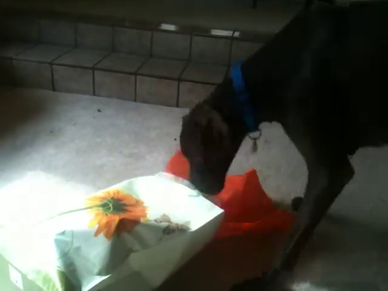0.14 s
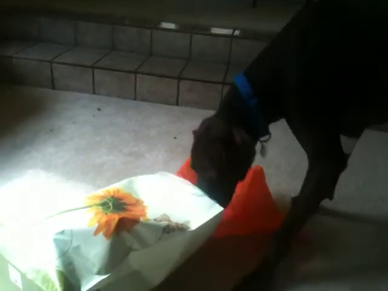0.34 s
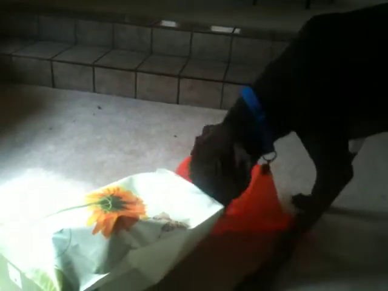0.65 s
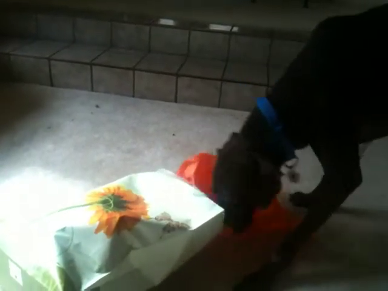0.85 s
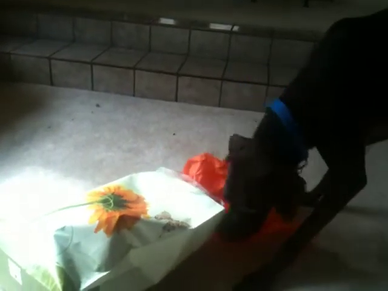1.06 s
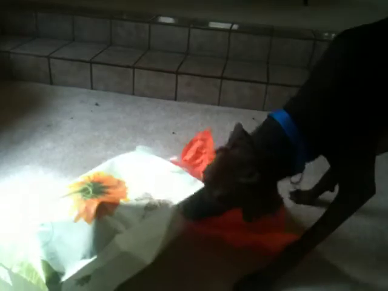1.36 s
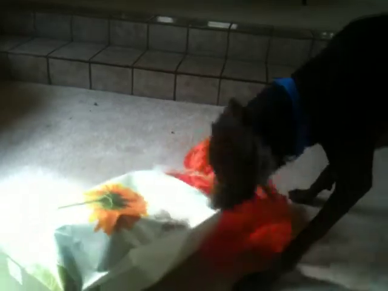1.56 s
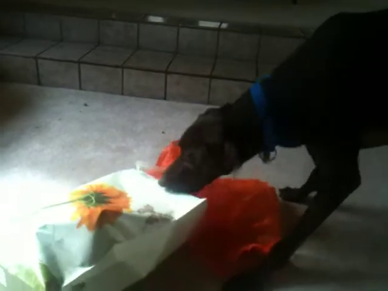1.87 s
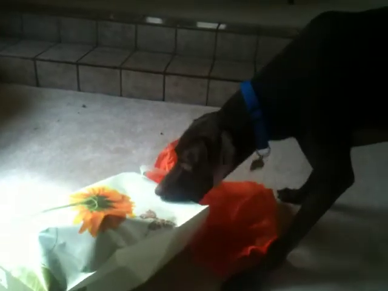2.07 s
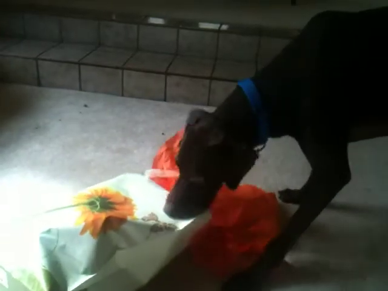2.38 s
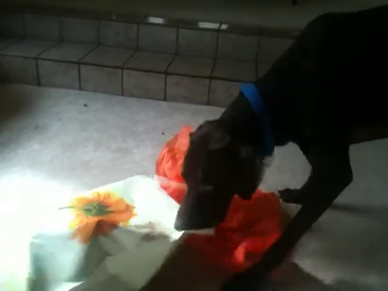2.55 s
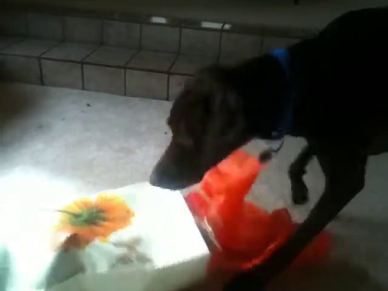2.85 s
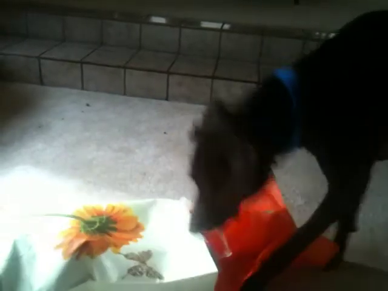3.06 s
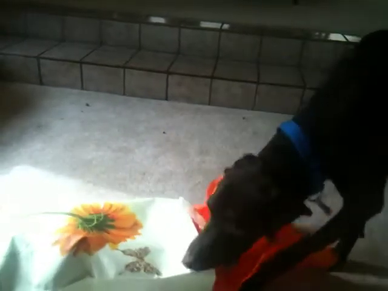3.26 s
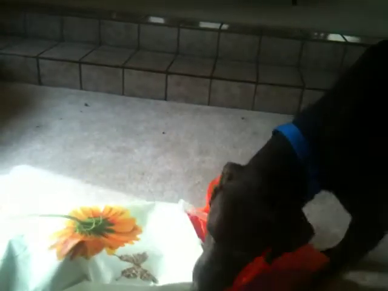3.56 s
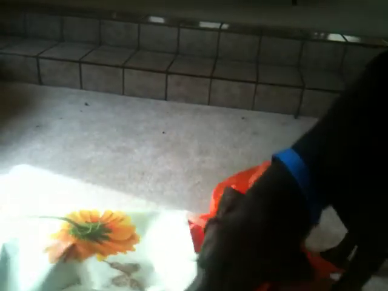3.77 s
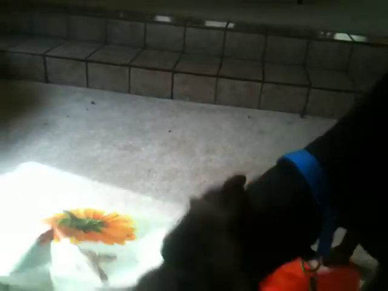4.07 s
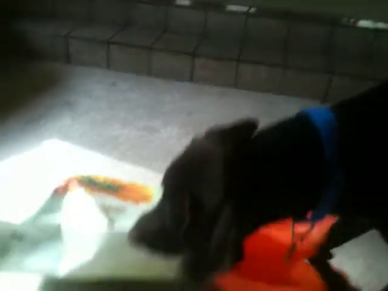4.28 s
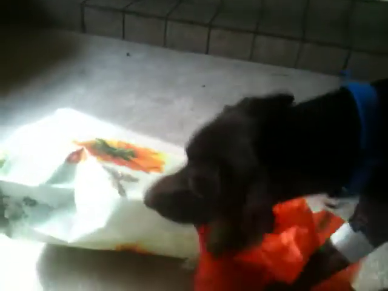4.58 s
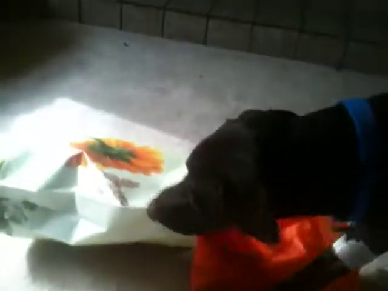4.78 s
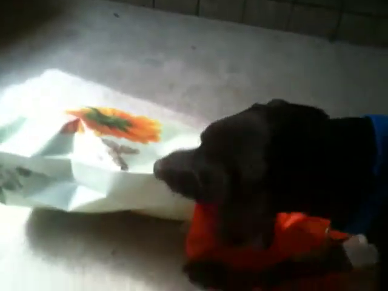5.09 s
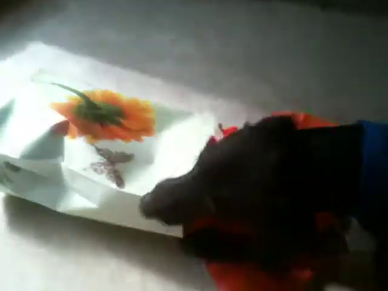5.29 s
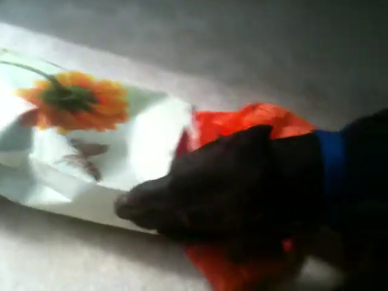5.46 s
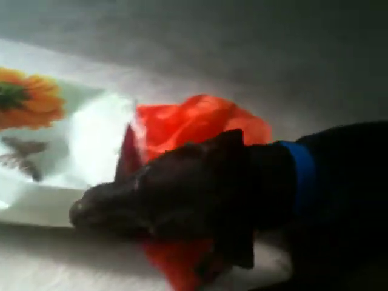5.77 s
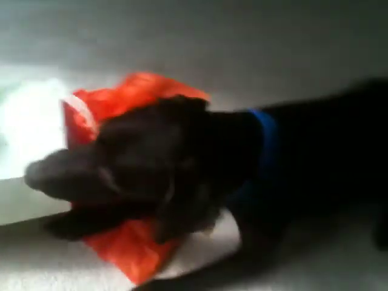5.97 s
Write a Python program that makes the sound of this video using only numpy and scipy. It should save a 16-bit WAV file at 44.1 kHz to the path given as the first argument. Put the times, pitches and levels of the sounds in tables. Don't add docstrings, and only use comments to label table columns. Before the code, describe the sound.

Close, dry rustling of thin tissue and a stiff paper bag as a dog noses in. Small crackles thicken, pause around two seconds with tiny metallic collar clinks, then a very loud bag snap bursts out. More scrunching builds to another busy run of sharp cracks, then settles into lighter crinkling. Small indoor room, brief reverberation, thin microphone with little bass and faint hiss.

```python
import sys
import numpy as np
from scipy import signal
from scipy.fft import rfft, irfft, next_fast_len
from scipy.io import wavfile
from scipy.ndimage import uniform_filter1d, map_coordinates

SR = 44100
rng = np.random.default_rng(int(sys.argv[2]) if len(sys.argv) > 2 else 0)


def waveform_to_disk(signal):
    frames = np.transpose(np.atleast_2d(signal))
    scaled = np.clip(frames, -1, 1) * 32767
    samples = np.round(scaled).astype(np.int16)
    wavfile.write(sys.argv[1], SR, samples)


def rack_gain(trim_db):
    fader = np.asarray(trim_db, float)
    return 10 ** (fader / 20)


N = 270333

# start in seconds, hold in seconds, wall scrape level in dB,
# stirred air in dB re the scrape.
SHOVES = [(0.007, 0.3, -57, -11.5), (0.437, 0.39, -60.5, -7.5), (0.934, 0.089, -56, -7.5),
          (1.215, 0.12, -55.5, -4.5), (1.303, 0.11, -57.5, 1), (1.48, 0.13, -56.5, -1.5),
          (1.846, 0.033, -63.5, 2), (1.984, 0.025, -63, -19), (2.377, 0.041, -61.5, -5),
          (2.546, 0.095, -51.5, -1), (2.69, 0.068, -49.5, -8), (2.834, 0.015, -40.5, -1),
          (2.992, 0.07, -55, -3), (3.203, 0.018, -60, -8), (3.514, 0.033, -59.5, -1.5),
          (3.695, 0.094, -55.5, -8.5), (3.858, 0.14, -52.5, -1.5), (4.121, 0.0104, -43.5, -1),
          (4.21, 0.23, -53, -16), (4.358, 0.074, -48, -13), (4.432, 0.046, -49.5, -2),
          (4.564, 0.083, -45.5, -13), (4.751, 0.098, -50, -9.5), (4.91, 0.4, -57, -5),
          (5.319, 0.054, -51.5, 0), (5.474, 0.017, -51.5, 0), (5.607, .15, -61, -1.5),
          (5.75, 0.082, -57, 1.5), (5.902, 0.05, -51.5, -11), (6.013, 0.022, -57.5, 5.5)]
# start in seconds, hold in seconds, fizz level in dB,
# time to sink 10 dB in seconds (its size counts).
DRAGS = [(0, 0.13, -59, 0.14), (.165, .06, -56.5, .06), (0.297, .05, -58.5, .25), (.55, 0.089, -62.5, 0.2),
         (.745, .02, -57.5, 0.15), (0.868, .16, -56, 0.07), (1.138, 0.17, -54.5, .13),
         (1.45, .17, -59, 0.06), (1.81, 0.14, -67, .15), (1.947, .01, -61.5, .012),
         (2.1, 0.037, -66.5, -0.1), (2.239, .02, -63.5, -0.06), (2.36, 0.18, -64.5, 0.3),
         (2.57, .12, -52.5, .1), (2.7, 0.1, -50.5, .05), (2.84, .02, -45.5, 0.0842),
         (2.935, 0.093, -55.5, .1), (3.118, 0.13, -64, 0.3), (3.503, 0.028, -56.5, .11),
         (3.722, 0.064, -56.5, 0.3), (3.895, 0.11, -54, 0.13), (4.108, .02, -49, 0.1), (4.2, .12, -55, 0.2),
         (4.338, 0.15, -46, .08), (4.562, 0.096, -43, 0.02), (4.69, .05, -53, 0.1),
         (4.898, 0.037, -55.5, 0.13), (4.77, 0.094, -48, .06), (4.98, 0.24, -59.5, 0.24),
         (5.306, 0.082, -55, .08), (5.477, 0.17, -62, .1), (5.723, 0.13, -58.5, .03),
         (5.887, .1, -52.5, .08), (6.08, .06, -64, .1)]
# time in seconds, treble lift in dB.
TISSUE_SHEEN = [(0, 7.5), (.4, 2.5), (.8, 7.5), (1.3, 3), (1.7, 3), (1.95, 14.5), (2.3, 12), (2.5, 7),
                (2.9, -5), (3.15, 7), (3.7, 1.5), (4.25, -5.5), (4.45, 2.5), (4.62, 5.5), (4.75, 0.5),
                (5.5, 4.5), (5.9, -1), (6.13, 2)]
# frequency in Hz, level in dB per Hz.
WALL_SPECTRUM = [(350, -32), (600, -20.5), (743, -4.5), (920, -6.5), (1170, 0.5), (1650, 0.5), (2230, 3),
                 (3500, -4.5), (4550, -26), (7700, -120)]
# frequency in Hz, level in dB per Hz.
TISSUE_SPECTRUM = [(1880, -53.5), (3200, 0.5), (3510, -4), (6370, -1.5), (8320, -5), (9960, -13.5),
                   (12800, -15.5), (14200, -22), (15400, -20), (15800, -12.5)]
# frequency in Hz, level in dB per Hz.
AIR_SPECTRUM = [(18, -44), (30, -6), (75, -12), (183, -2.5), (271, -2), (382, 0), (598, -8), (700, -9),
                (910, -18.5), (1540, -120)]


def rustle():
    shove_rise_s, shove_fall_s, drag_rise_s = 0.05, 0.083, 0.036
    start, hold, db, air_db = np.transpose(SHOVES)[:, :, None]
    scrape_gain = strokes(start, hold, db, shove_rise_s, shove_fall_s, rest_db=-99)
    stir_gain = strokes(start, hold, db + air_db, shove_rise_s, shove_fall_s, rest_db=-70)
    start, hold, db, fall = np.transpose(DRAGS)[:, :, None]
    drag_gain = strokes(start, hold, db, drag_rise_s, fall, rest_db=-74)
    shared_db = 1.2 * wobble(40) - 2.5

    wall = creases(rate=1300, low_hz=600, high_hz=4000, cycles=9, spread_db=3, clump_db=2.8, smooth=.68)
    wall = unit(coloured(wall, WALL_SPECTRUM))
    fizz = creases(rate=2500, low_hz=3200, high_hz=15000, cycles=8, spread_db=3.1, clump_db=2.5, smooth=.56)
    fizz = unit(coloured(fizz, TISSUE_SPECTRUM))
    sheen_s, sheen_db = np.transpose(TISSUE_SHEEN)
    sheen_db = np.interp(np.arange(N) / SR, sheen_s, sheen_db)
    dull = signal.filtfilt(*signal.butter(1, 6500, fs=SR), fizz)
    fizz = dull * rack_gain(-.4 * sheen_db) + (fizz - dull) * rack_gain(sheen_db)
    air = unit(coloured(rack_gain(2.6 * wobble(31)) * rng.standard_normal(N), AIR_SPECTRUM))
    return rack_gain(shared_db) * (scrape_gain * wall + drag_gain * fizz + stir_gain * air)


def strokes(start, hold, db, rise, fall, rest_db):
    t = np.arange(0, N + 64, 64) / SR
    early = np.maximum(start - t, 0) / rise
    late = np.maximum(t - start - np.abs(hold), 0) / np.abs(fall)
    power = np.sum(rack_gain(db - 10 * (early + late)) ** 2, axis=0) + rack_gain(rest_db) ** 2
    return np.interp(np.arange(N) / SR, t, np.sqrt(power))


def creases(rate, low_hz, high_hz, cycles, spread_db, clump_db, smooth):
    chance = rate / SR * rack_gain(clump_db * wobble(70))
    s = np.flatnonzero(rng.random(N) < chance) / SR
    draw = rng.random((N // 8, 3, 1))[:len(s)]
    hz = low_hz * (high_hz / low_hz) ** draw[:, 0]
    size_db = spread_db * np.minimum(-np.log(1 - draw[:, 1]), 4)
    size = rack_gain(size_db) * np.sqrt(hz) * np.sign(draw[:, 2] - .5)
    t = np.arange(160) / SR
    clicks = place(s[:len(draw)], size * rack_gain(-60 * t * hz / cycles) * np.sin(2 * np.pi * hz * t))
    slide = patchy(rng.standard_normal(N), depth_db=1.5)
    return np.sqrt(1 - smooth) * unit(clicks) + np.sqrt(smooth) * unit(slide)


def patchy(x, depth_db):
    z = signal.stft(x, nperseg=256)[2]
    field = uniform_filter1d(rng.standard_normal(z.shape), size=5, axis=0)
    field = uniform_filter1d(field, size=6, axis=1)
    return signal.istft(z * rack_gain(depth_db * unit(field)), nperseg=256)[1][:N]


# time in seconds, wall ring in dB, crack in dB re the ring, wall pitch in Hz.
BUCKLES = [(1.3, -28, -23, 1350), (1.369, -42.5, -13, 1500), (1.438, -44, -5, 2350),
           (1.511, -38, -17, 1230), (1.581, -41.5, -19, 1400), (1.631, -45.5, -1, 2190),
           (2.359, -48.5, -3, 1210), (2.545, -45, -20, 1480), (2.752, -41.5, 5, 1540),
           (2.832, -21.5, -6.5, 2230), (2.924, -39, -26, 1320), (3.434, -45.5, -32, 1130),
           (3.501, -46.5, -5, 2280), (3.65, -35, -12, 1610), (3.682, -42, -6, 2520), (3.856, -47, -3, 1410),
           (3.873, -35, -13, 1410), (3.896, -33.5, -14, 1740), (3.976, -40.5, -21, 1740),
           (4.033, -40.5, 2.5, 1420), (4.105, -29.5, -6.5, 2260), (4.272, -45, -18, 1130),
           (4.33, -41.5, -10, 2200), (4.366, -40, -13, 2360), (4.4149, -22.5, -9, 1710),
           (4.488, -23.5, -15, 2270), (5.483, -32, -7.5, 2420), (5.794, -38, -13, 1350),
           (5.849, -28, -4.5, 1820), (6.031, -46, -23, 1210), (1.72, -59, -2, 3020),
           (2.017, -57.5, 7.5, 2800), (2.084, -61, 7, 1000), (2.188, -65, 4, 2300), (5.715, -60, -1, 2300)]
# time in seconds, wall ring in dB, wall pitch in Hz.
FOLDS = [(.747, -49.5, 2270), (1.307, -48, 1130), (1.49, -48, 1280), (1.72, -60, 2820), (1.805, -58.5, 830),
         (2.08, -50.5, 2310), (2.46, -57, 942), (2.564, -40.5, 1170), (2.603, -47, 1440),
         (2.733, -43, 1720), (2.8, -46, 1150), (2.847, -26, 2160), (2.86, -39, 1160), (2.843, -36, 1100),
         (2.838, -39, 810), (.017, -49, 2250), (2.994, -52, 2230), (3.195, -52, 790), (3.327, -56, 1550),
         (3.596, -50.5, 1500), (4.12, -30, 1640), (4.126, -30.5, 1840), (4.49, -27, 2140),
         (5.116, -50.5, 1430), (5.182, -44.5, 1280), (5.233, -50, 1540), (5.311, -42.5, 1460),
         (5.324, -38.5, 1490), (5.347, -42, 1360), (5.412, -41.5, 1240), (5.511, -44, 1290),
         (5.632, -47.5, 1980), (5.862, -44, 1740)]
# time in seconds, wall ring in dB, wall pitch in Hz.
PANELS = [(1.301, -33, 2620), (1.357, -46, 2340), (1.423, -54, 1210), (1.438, -49, 1470),
          (1.511, -42, 1880), (1.579, -55, 2230), (1.581, -51, 950), (2.832, -25, 1480), (3.434, -54, 730),
          (3.637, -52, 1120), (3.65, -35, 2500), (3.65, -43.5, 1200), (3.683, -51, 1800),
          (3.974, -51.5, 1200), (4.032, -46, 2300), (4.104, -33.5, 1500), (4.106, -34, 3000),
          (4.122, -37, 950), (1.583, -47, 1700), (5.2, -51, 620), (5.33, -48, 650), (2.7, -54, 700),
          (2.58, -49.5, 750), (4.4142, -25, 2440), (4.415, -30.5, 1210), (4.486, -31, 1300),
          (4.494, -31.5, 1530), (4.5, -35.5, 876), (4.502, -51, 1690), (4.76, -49, 1250),
          (5.483, -44, 1520), (5.652, -49.5, 1160), (5.78, -54, 1500), (5.828, -56, 1260),
          (5.849, -28, 2700), (5.849, -40, 1390), (5.855, -37, 2300)]
# time in seconds, crack level in dB.
TICKS = [(0.108, -40), (0.16, -46), (0.2997, -49), (0.742, -42.5), (0.76, -37), (0.7997, -42), (0.865, -46),
         (0.878, -40.5), (0.899, -45), (0.998, -46), (1.0063, -35), (1.068, -42.5), (1.1215, -39.5),
         (1.1432, -40.5), (1.1543, -45), (1.1675, -34.5), (1.178, -43), (1.1978, -46), (1.2393, -38),
         (1.261, -39.5), (1.295, -44), (1.3094, -45), (1.4885, -43), (1.615, -49), (2.111, -48),
         (2.601, -43), (2.7092, -48), (2.8, -34), (2.848, -27), (2.9851, -50), (3.014, -41),
         (3.1815, -46.5), (3.496, -48), (3.7077, -44), (4.4677, -36), (4.568, -33), (4.577, -32),
         (4.587, -30.5), (4.6242, -31), (4.6568, -31), (4.688, -44), (4.7178, -42), (4.795, -47),
         (4.8426, -38), (4.872, -44), (4.9102, -55), (4.9294, -56), (4.9761, -63), (4.9766, -49),
         (5.043, -43.5), (5.071, -40.5), (5.117, -53), (5.2, -43), (5.234, -39), (5.303, -41),
         (5.354, -36.5), (5.3815, -41), (5.5947, -45), (5.8536, -35), (5.9583, -40)]
# frequency in Hz, level in dB per Hz.
BAG_CRACK_SPECTRUM = [(1760, 0), (2600, 5), (3400, 1.5), (4600, 7), (6360, 3.5), (8000, -2.5), (9400, -15),
                      (11300, -14.5), (15800, -38)]
# frequency in Hz, level in dB per Hz.
TISSUE_CRACK_SPECTRUM = [(1760, 0), (2600, 3.5), (3400, 7), (4600, 4.5), (6360, 5.5), (7300, -2.5),
                         (8050, 4.5), (9380, -5), (11300, -14), (15800, -34)]


def snaps():
    # (s, ring dB, crack dB re ring, wall Hz, crack t60 s)
    bag = [(*row, .0072) for row in BUCKLES]
    bag += [(s, db, -14, hz, .007) for s, db, hz in FOLDS]
    bag += [(s, db, -25, hz, .007) for s, db, hz in PANELS]
    passed_db = -6.5
    tissue = [(s, db - 8 + passed_db, -passed_db, 2270, .0052) for s, db in TICKS]
    s, db, crack_db, hz, t60 = np.transpose(bag + tissue)[:, :, None]
    t = np.arange(1400) / SR
    ring = thud(hz, hz, t, cycles=19.6, scatter=0.38, run=0.004002, side_db=-13.0, spread_db=4.5, count=8)
    decay = rack_gain(-60 * t / t60) + rack_gain(-1 - 60 * t / (3 * t60))
    burst = decay * (1 - np.exp(-t / 0.00027)) * rng.standard_normal(ring.shape)
    burst /= np.abs(burst).max(axis=1, keepdims=True)
    burst = rack_gain(db + crack_db + 8.5) * burst
    n = len(bag)
    bag_crack = coloured(place(s[:n, 0], burst[:n]), BAG_CRACK_SPECTRUM)
    tissue_crack = coloured(place(s[n:, 0], burst[n:]), TISSUE_CRACK_SPECTRUM)
    return place(s[:, 0], rack_gain(db + 4) * ring) + bag_crack + tissue_crack


def thud(hz, body_hz, t, cycles, scatter, run, side_db, spread_db, count):
    draw = rng.uniform(-1, 1, (len(hz), 3, count))
    rows = np.sin(2 * np.pi * hz * t) * rack_gain(-60 * t * hz / cycles)
    for k in range(count):
        late = np.maximum(t - run * draw[:, 0, k, None] ** 2, 0)
        side_hz = hz * (body_hz / hz) ** 0.38 * np.exp(scatter * draw[:, 1, k, None])
        mode_db = side_db + spread_db * draw[:, 2, k, None] - 60 * late * hz / cycles
        rows += rack_gain(mode_db) * np.sin(2 * np.pi * side_hz * late)
    rows *= 1 - np.exp(-t * hz / 0.85)
    return rows / np.abs(rows).max(axis=1, keepdims=True)


# time in seconds, peak level in dB.
SPIKES = [(1.3005, -36), (2.7518, -37), (2.7996, -36), (2.8325, -13.5), (2.8335, -14.5), (2.8482, -24),
          (3.6505, -45), (4.104, -33), (4.4148, -27), (4.4874, -32), (4.5867, -30), (4.7952, -40),
          (5.483, -42), (5.8497, -19.5), (1.6325, -43), (2.5273, -50), (4.3652, -40), (4.033, -42),
          (3.0142, -45), (5.311, -42), (5.856, -33)]
# frequency in Hz, level in dB per Hz.
SPIKE_SPECTRUM = [(900, -14.5), (2000, 0), (3400, -0.5), (4600, 0.5), (6200, 1.5), (8000, -8), (11000, -17),
                  (13500, -26), (15800, -44)]


def spikes():
    s, db = np.transpose(SPIKES)[:, :, None]
    t = np.arange(300) / SR
    burst = rack_gain(-60 * t / 0.0026) * rng.standard_normal((len(s), len(t)))
    burst /= np.abs(burst).max(axis=1, keepdims=True)
    return coloured(place(s[:, 0], rack_gain(db + 3) * burst), SPIKE_SPECTRUM)


# time in seconds, peak level in dB, pitch in Hz.
PUFFS = [(0.094, -51.5, 275), (0.924, -50.5, 295), (1.208, -43, 266), (1.301, -36.5, 408),
         (1.361, -45, 306), (1.654, -48, 368), (3.655, -48, 390), (3.51, -51, 144), (4.8, -60, 141),
         (4.495, -35, 500), (1.509, -41, 374), (1.581, -41, 420), (1.974, -50, 282), (2.365, -41, 362),
         (2.629, -59, 323), (2.715, -42.5, 377), (2.828, -30, 264), (3.5, -49, 387), (3.601, -49.5, 230),
         (1.37, -51, 150), (1.205, -53, 120), (4.49, -41, 179), (2.39, -52.5, 170), (1.76, -58, 300),
         (5.3, -51, 150), (3.869, -41, 362), (3.973, -41.5, 383), (4.107, -38, 323), (4.18, -48, 358),
         (4.27, -42.5, 314), (4.412, -36, 350), (4.482, -32, 385), (4.619, -48, 279), (4.757, -47, 365),
         (4.89, -49, 294), (5.181, -45, 244), (5.233, -47, 300), (5.307, -40.5, 358), (5.487, -40.5, 460),
         (5.931, -49.5, 244), (6.028, -40, 415)]


def puffs():
    s, db, hz = np.transpose(PUFFS)[:, :, None]
    t = np.arange(4000) / SR
    bounce = thud(hz, 296, t, cycles=9.2, scatter=0.643, run=0.0114, side_db=-12.5, spread_db=7.5, count=6)
    return place(s[:, 0], rack_gain(db) * bounce)


# time in seconds, peak level in dB, share of the thin tag from 0 to 1.
CLINKS = [(1.808, -61, 0), (1.826, -58, .02), (1.853, -62, .02), (1.894, -50, 0), (1.909, -53.5, 0.1),
          (1.9345, -45, 0), (1.94, -33.5, 0.3), (2.121, -45, 0), (2.129, -49, 0.9), (3.133, -49, 0.33),
          (3.229, -51, 0.8)]
# frequency in Hz, level in dB, t60 in seconds.
THICK_TAG = [(6260, 6, 0.026), (7020, 6.5, 0.018), (12400, -10, .035), (15200, -19, 0.036)]
# frequency in Hz, level in dB, t60 in seconds.
THIN_TAG = [(8650, 8, 0.045), (11670, -5, 0.062)]
# time in seconds, peak level in dB.
RING_STRIKES = [
    (0.2987, -36),
]
# frequency in Hz, level in dB, t60 in seconds.
RING_MODES = [(2733, 3, 0.055), (4684, -3, 0.05), (5650, 0.5, 0.038)]


def collar():
    s, db, thin = np.transpose(CLINKS)[:, :, None]
    tags = (1 - thin) * metal(THICK_TAG, count=len(s)) + thin * metal(THIN_TAG, count=len(s))
    t = np.arange(tags.shape[1]) / SR
    tick = np.diff(rng.standard_normal(tags.shape), 2, prepend=0, append=0) * rack_gain(-3.5 - 60 * t / 0.013)
    clinks = place(s[:, 0], rack_gain(db - 8) * (tags + tick))
    s, db = np.transpose(RING_STRIKES)[:, :, None]
    return clinks + place(s[:, 0], rack_gain(db - 10) * metal(RING_MODES, count=len(s)))


def metal(modes, count):
    t = np.arange(6000) / SR
    strikes = np.zeros((count, len(t)))
    for hz, db, t60 in modes:
        strength_db = 2 * rng.standard_normal((count, 1))
        strikes += rack_gain(db + strength_db - 60 * t / t60) * np.sin(2 * np.pi * hz * t)
    return strikes


# time in seconds, length in seconds, peak level in dB, pitch in Hz.
SQUEAKS = [
    (2.475, 0.033, -60, 1850),
    (1.8, .13, -65.5, 6200),
    (2.115, .04, -66, 2300),
    (3.44, 0.0376, -60.5, 690),
]


def squeaks():
    s, length, db, hz = np.transpose(SQUEAKS)[:, :, None]
    u = np.clip((np.arange(N) / SR - s) / length, 0, 1)
    waver = 1 + 0.0116 * wobble(150)
    phase = 2 * np.pi * np.cumsum(hz * waver, axis=1) / SR
    swell = np.sqrt(np.sin(np.pi * u).clip(0))
    return np.sum(rack_gain(db + 4.2 * wobble(90)) * swell * np.sin(phase), axis=0)


# frequency in Hz, t60 in seconds.
ROOM_DECAY = [(150, 0.34), (2000, 0.12), (6000, 0.088), (14000, 0.043)]


def room(x):
    hz, t, z = signal.stft(rng.standard_normal(SR // 2), SR, nperseg=256)
    decay = rack_gain(-60 * t / along(ROOM_DECAY, hz)[:, None])
    tail = signal.istft(z * decay, SR, nperseg=256)[1]
    tail = np.pad(tail / np.linalg.norm(tail), (200, 0))
    tail[[270, 640]] += [.5, .4]
    return signal.fftconvolve(x, tail)[:N]


def unit(x):
    return x / np.sqrt(np.mean(x ** 2) + 1e-20)


def along(points, hz):
    f, v = np.transpose(points)
    return np.interp(np.log(hz + 1), np.log(f + 1), v)


def wobble(rate):
    return map_coordinates(rng.standard_normal(int(N * rate / SR) + 4), [np.arange(N) * rate / SR])


def coloured(x, spectrum):
    gain = rack_gain(along(spectrum, np.fft.rfftfreq(2048, 1 / SR)))
    cep = irfft(np.log(np.maximum(gain, 1e-4)))
    cep[1:1024] *= 2
    cep[1025:] = 0
    h = irfft(np.exp(rfft(cep)))
    return signal.fftconvolve(x, h / np.linalg.norm(h))[:N]


def place(s, rows):
    at = np.round(s * SR).astype(int)[:, None] + np.arange(rows.shape[1])
    return np.bincount(at.ravel(), rows.ravel(), N + rows.shape[1] + SR)[:N]


def scene():
    hits = snaps() + spikes() + puffs() + collar() + squeaks()
    return (hits + rustle() + rack_gain(-13.5) * room(hits))[None]


# frequency in Hz, share lost from 0 to 1.
LOST_STEADY = [(7000, 0), (9000, .3), (10300, .55), (13000, .66), (15500, .74)]
# frequency in Hz, share lost from 0 to 1.
LOST_NEAR_CLICKS = [(3000, 0), (8500, .06), (9800, .6), (13500, .7), (15500, .85)]


def sparse_treble(x):
    steady = thinned(x, size=2048, lost=LOST_STEADY, wide=4, long=4, favour=.5)
    broken = thinned(x, size=256, lost=LOST_NEAR_CLICKS, wide=4, long=2, favour=.8)
    power = uniform_filter1d(np.diff(x, prepend=0) ** 2, size=128)[::128]
    before = np.roll(uniform_filter1d(power, size=8), 5)
    jumps = np.repeat(power > before * rack_gain(2 * 7.5), 128)[:N]
    near = uniform_filter1d(1. * jumps, size=1800) > 1e-4
    near = uniform_filter1d(1. * near, size=200)
    return near * broken + (1 - near) * steady


def thinned(x, size, lost, wide, long, favour):
    hz, _, z = signal.stft(x, SR, nperseg=size)
    level = np.log(np.abs(z) + 1e-9)
    stands_out = level - uniform_filter1d(uniform_filter1d(level, 9, axis=0), 9, axis=1)
    field = uniform_filter1d(rng.standard_normal(z.shape), wide, axis=0)
    field = unit(uniform_filter1d(field, long, axis=1))
    share = along(lost, hz)[:, None]
    rank = 1 / (1 + np.exp(-1.7 * unit(field + favour * stands_out)))
    kept = z * (rank > share) / (1 - share) ** .35
    return signal.istft(kept, SR, nperseg=size)[1][:N]


def roll_off(x):
    return signal.sosfilt(signal.butter(12, 15700, fs=SR, output="sos"), x)


# frequency in Hz, gain in dB.
MIC_RESPONSE = [(20, -26), (60, -26.5), (110, -8.5), (170, -1), (420, -0.5), (620, -3.5), (900, -0.5),
                (2700, -1.5), (3400, -6), (4400, 1), (5200, -0.5), (6300, -0.5), (15700, 0), (15950, -33)]
# frequency in Hz, level in dB per Hz.
HISS_SPECTRUM = [(30, -26), (70, -21), (150, -9), (400, -12), (2000, -5), (9000, -28), (15700, -18),
                 (15950, -37)]


def record(dry):
    m = next_fast_len(N + SR // 4)
    response = rack_gain(along(MIC_RESPONSE, np.fft.rfftfreq(m, 1 / SR)))
    heard = irfft(rfft(dry, m) * response, m)[:, :N]
    heard = heard + rack_gain(-68.5) * unit(coloured(rng.standard_normal(N), HISS_SPECTRUM))
    heard = heard / (1 + np.abs(heard / .25) ** 6) ** (1 / 6)
    mix = sparse_treble(heard[0])[None]
    return roll_off(mix)


dry = scene()
out = record(dry)
waveform_to_disk(out)
```